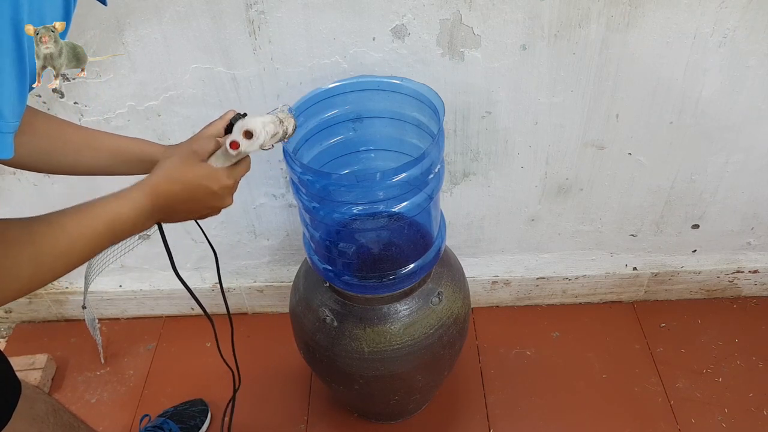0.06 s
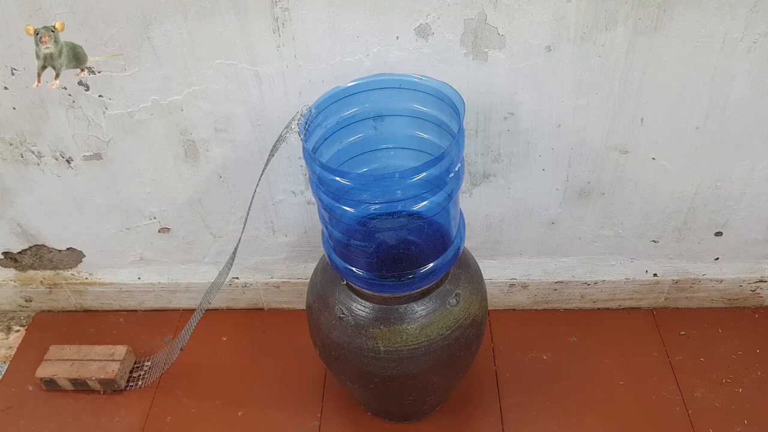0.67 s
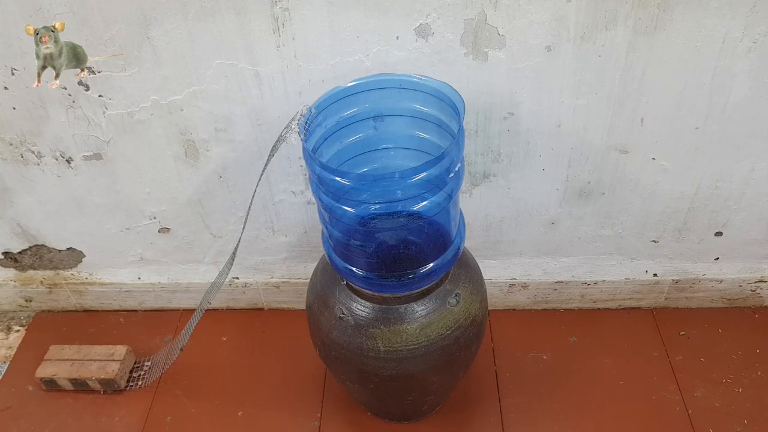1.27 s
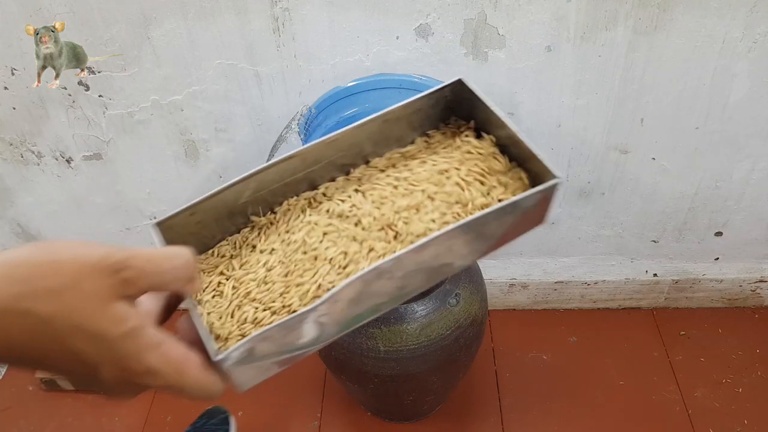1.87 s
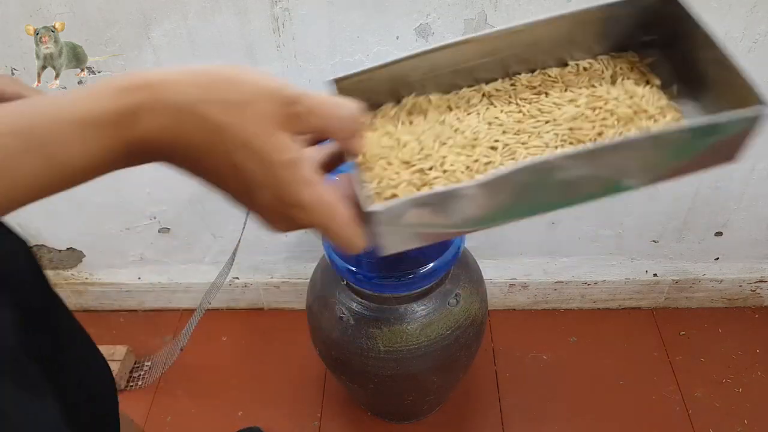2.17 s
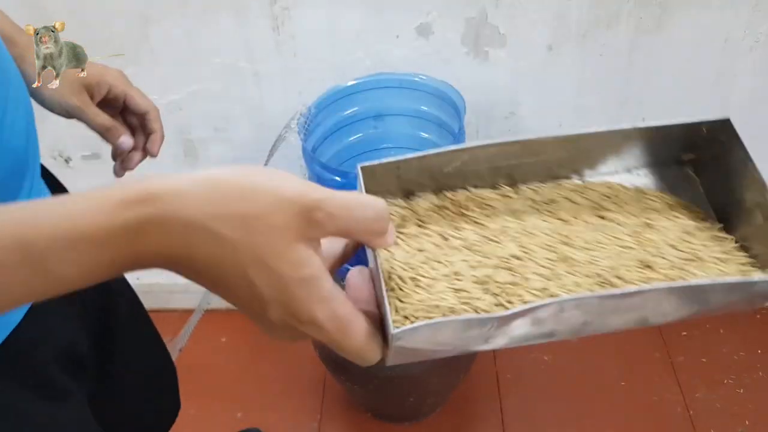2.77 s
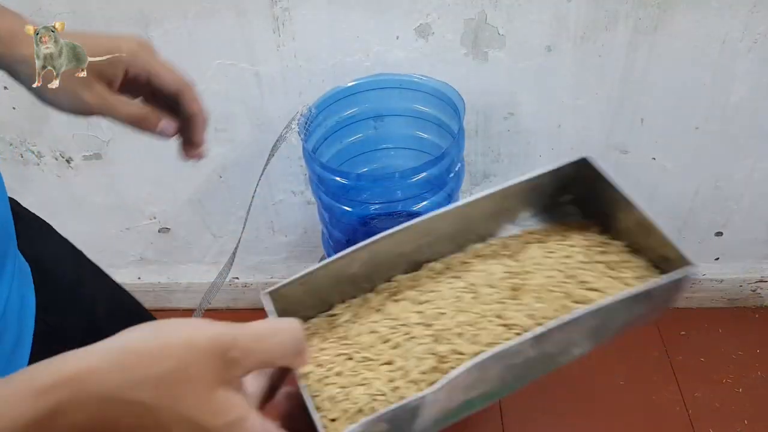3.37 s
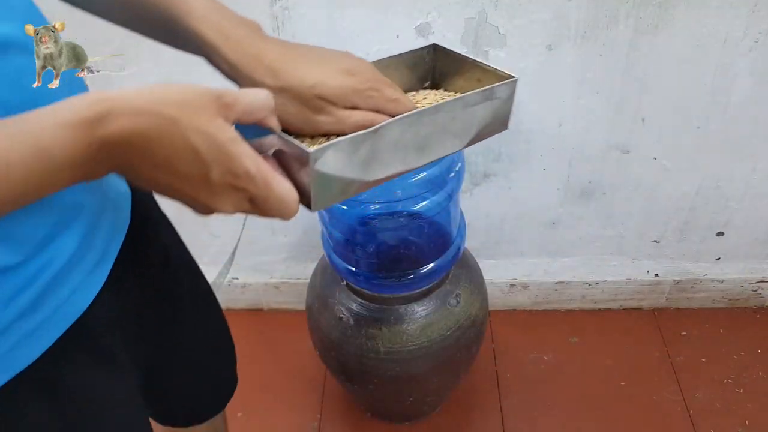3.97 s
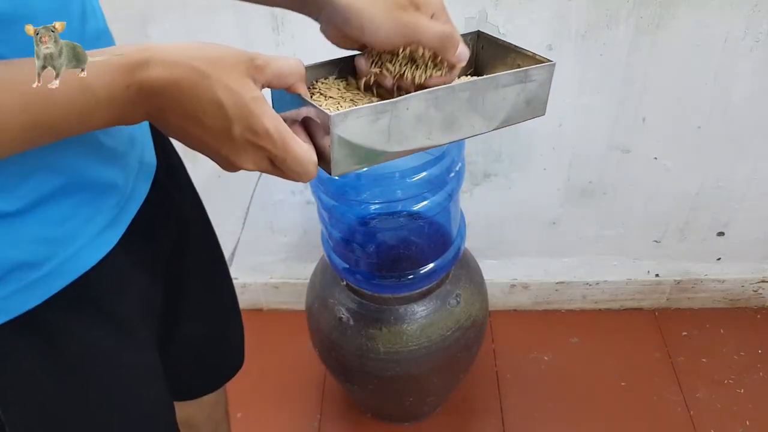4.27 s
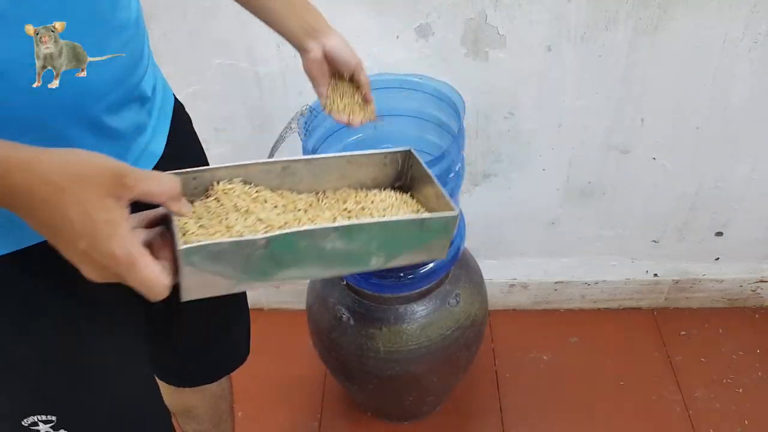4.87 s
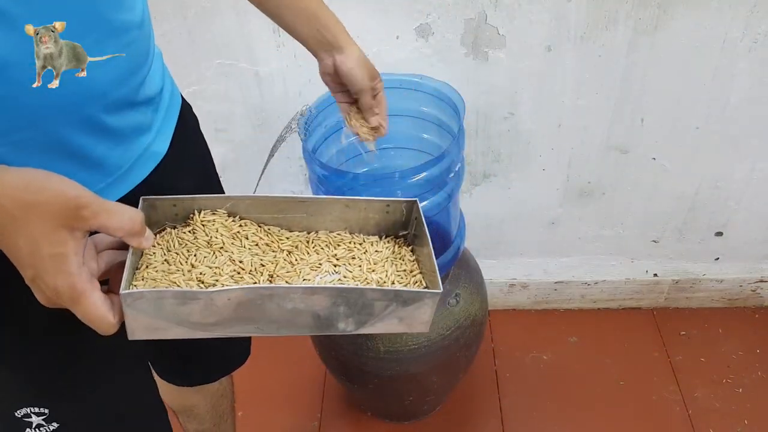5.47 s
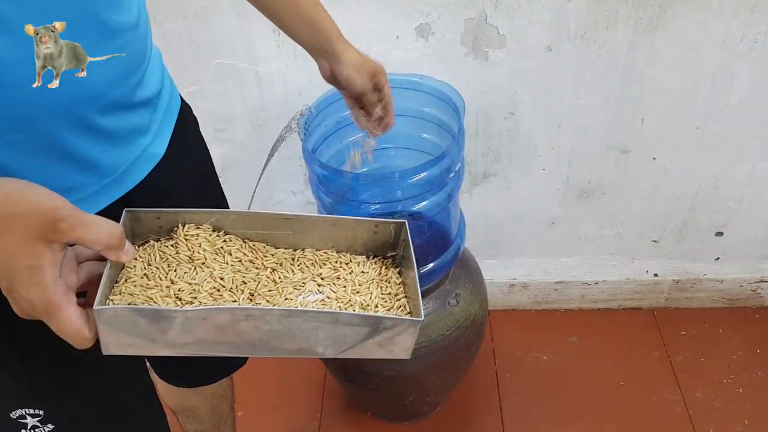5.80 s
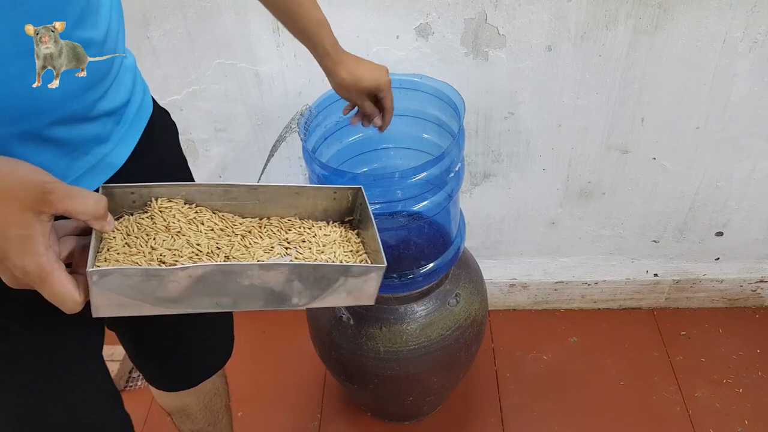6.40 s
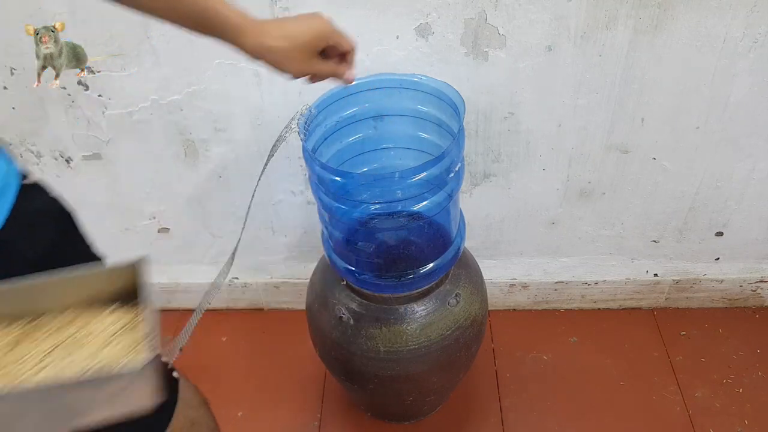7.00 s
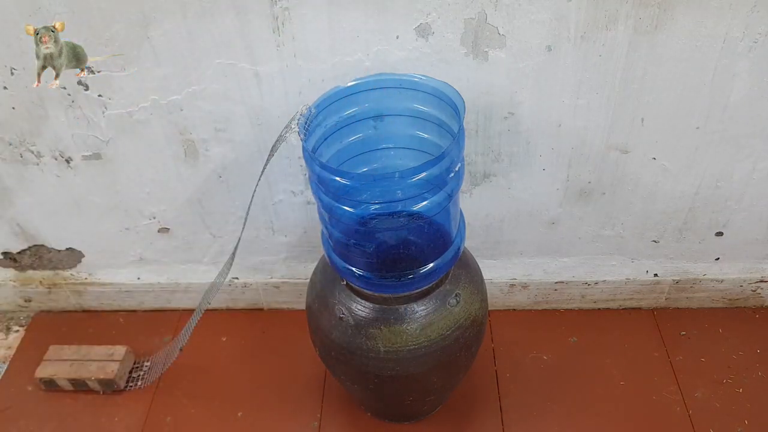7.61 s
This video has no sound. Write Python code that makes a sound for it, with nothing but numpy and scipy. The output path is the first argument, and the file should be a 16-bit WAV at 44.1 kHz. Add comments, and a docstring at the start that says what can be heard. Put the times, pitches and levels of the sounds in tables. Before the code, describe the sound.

Dry grain swishes back and forth in a metal tray indoors, then patters from a hand into a hollow plastic bottle.

```python
"""A bare tiled room, heard on a close pair of microphones over quiet air and a low hum.
Soft steps, scuffs and thin hisses come first, then a metal tray of unhusked rice is shaken to and fro,
the husks scraping its floor. Among faint squeaks and a knock, a hand digs out a fistful and lifts it.
The grain runs from the fist, drums into a big cut-off plastic bottle and thins to single kernels
ticking on its wall. A few more steps and two light knocks end the scene."""
import sys
import numpy as np
from scipy import signal
from scipy.fft import rfft, irfft, next_fast_len
from scipy.io import wavfile
from scipy.ndimage import uniform_filter1d

SR = 44100
rng = np.random.default_rng(int(sys.argv[2]) if len(sys.argv) > 2 else 0)


def bounce(signal):
    """Save signal as a 16-bit WAV file at the path given by the first command-line argument."""
    frames = np.transpose(np.atleast_2d(signal))
    limited = np.clip(frames, -1, 1)
    pcm = np.round(limited * 32767).astype(np.int16)
    wavfile.write(sys.argv[1], SR, pcm)


N = 337365
TIME = np.arange(N) / SR
SIZE = next_fast_len(N + SR, True)
FREQ = np.maximum(np.arange(SIZE // 2 + 1) * SR / SIZE, 1)
LEFT_RIGHT = np.array([[1], [-1]])

# The echo of the tiles. Each row: frequency in Hz, seconds to fall by 60 dB.
ROOM_T60 = [(100, 1), (500, 0.76), (2000, 0.48), (5000, 0.47), (15000, 0.43)]
# The lines of the low hum. Each row: frequency in Hz, width in Hz, level in dB.
HUM_LINES = [(55.2, 8.6, -76.5), (84.8, 7, -69), (159.5, 8.6, -65.5)]

# Sounds that start quickly and die away. Each row: start in seconds, level in dB, decay in seconds.
STEPS = [(.255, -43.5, 0.024), (.78, -47, .027), (.96, -56.5, 0.054), (1.345, -44.5, 0.032),
         (1.92, -49.5, 0.11), (4.34, -53.5, 0.072), (7.26, -54.5, .07), (7.57, -50, 0.052)]  # soft steps and shifts of weight
HISSES = [(.349, -50, 0.034), (.685, -55.5, 0.027), (1.472, -48.5, 0.046)]
KNOCKS = [(3.651, -49, 0.0087), (7.107, -42, 0.0065), (7.638, -36.5, 0.0065)]
CRUNCHES = [(4.05, -28.5, 0.052), (4.15, -40, 0.062), (4.33, -66, 0.024)]  # the fist closing on the grain
# Brushing sounds. Each row: peak time in seconds, level in dB, rise and fall time in seconds.
SCUFFS = [(.455, -44.5, 0.05), (.56, -72, 0.018), (.85, -59.5, 0.053), (1.42, -63.5, 0.054),
          (7.46, -55.5, 0.027)]
TRAY_RUBS = [(.59, -58, .025), (.91, -66, .04), (1.0, -65.5, 0.055), (1.13, -71, 0.032), (4.23, -52.5, .03),
             (4.375, -59.5, 0.028), (7.57, -70, 0.046)]
# Faint squeaks. Each row: start in seconds, level in dB, decay in seconds, pitch in Hz.
SQUEAKS = [(3.35, -52, .04, 5170), (4.24, -55, .05, 5150), (6.77, -55, .025, 4150), (7.23, -59, .035, 4300)]
# Grain moved by the hand. Each row: start in seconds, level in dB, length in seconds.
RAKES = [(3.648, -62, .03), (3.681, -38, 0.091), (3.765, -40, 0.085), (3.9, -45.5, 0.087), (4.0, -50, .05),
         (4.08, -50.5, 0.13)]  # fingers pushing through it
SIFTS = [(4.45, -54.5, 0.12), (4.64, -58, 0.094)]  # kernels falling off the lifted fist
SPURTS = [(4.98, -28.5, .1), (5.16, -23.5, .17), (5.41, -25.5, 0.17), (5.64, -24, 0.17),
          (5.9, -22.5, 0.071), (6.01, -28, 0.082), (6.15, -32, 0.051), (6.31, -34.5, 0.075),
          (6.622, -37, 0.033)]  # fingers loosening over the bottle
# Grain striking the bottle. Each row: start in seconds, relative level in dB.
STRAY_KERNELS = [(4.788, -25), (6.314, -19), (6.38, -19), (6.448, -22.5), (6.53, -29), (6.633, -25.5),
                 (6.7723, -34), (6.933, -26.5), (6.9455, -29), (6.958, -17.5), (7.0594, -39),
                 (7.138, -30.5)]
CLUMPS = [(4.8417, -22.5), (4.866, -18.5), (5.0694, -23.5), (5.1597, -15), (5.476, -18), (5.4895, -16),
          (5.5247, -16), (5.6467, -11), (5.666, -12)]

# The broad tone of each source. Each row: frequency in Hz, relative level in dB.
AIR_COLOUR = [(15, -5.5), (30, -1), (110, -7), (200, 0), (420, -7.5), (800, -21), (1250, -23), (2200, -27),
              (5000, -33), (11000, -31.5), (15500, -26)]
STEP_COLOUR = [(50, -15), (110, -8), (160, -14.5), (230, 3), (330, -12.5), (500, -8), (800, -23),
               (2500, -38)]
HISS_COLOUR = [(500, -27), (6000, -15), (10000, -7), (13000, -5), (15500, 2)]
SCUFF_COLOUR = [(150, -10), (450, -2), (750, -5), (1200, -1.5), (3000, -2), (5500, -2), (9000, -5.5),
                (15500, -12)]
RUB_COLOUR = [(200, -16), (450, 4), (800, -11), (1250, 0.5), (2000, -5.5), (3400, -15), (8000, -22)]
SLIDE_COLOUR = [(150, -23.5), (400, -18.5), (750, -13.5), (1000, -11.5), (1300, -2.5), (1800, -2),
                (2400, -7), (4000, -5.5), (5000, -8), (6500, -7.5), (9000, -10.5), (15500, -10)]
RAKE_COLOUR = [(150, -19), (350, -12.5), (700, -10.5), (950, -8), (1250, 2.5), (1850, -0.5), (2400, -3.5),
               (4000, -4), (7000, -7.5), (15500, -12.5)]
CRUNCH_COLOUR = [(60, -17), (150, -4.5), (300, 1.5), (420, -3), (560, 0.5), (780, -7), (1400, -4.5),
                 (2500, -8), (4500, -18), (9000, -53)]
KNOCK_COLOUR = [(150, -19), (700, -12), (1500, -19), (4000, -22.5), (12000, -25)]
SIFT_COLOUR = [(700, -31), (1400, -13), (3000, -8.5), (6300, -0.5), (11000, -4.5), (15500, -4)]
BOTTLE_WALL_COLOUR = [(300, -26), (800, -34), (1300, -19), (2000, -15), (3000, -11.5), (5000, -17.5),
                      (9500, -17.5), (15500, -21)]
POUR_COLOUR = [(200, -26), (430, -21), (600, -20.5), (760, -20), (1100, -15), (1700, -7), (2300, 0),
               (3100, 2), (4500, -2), (7000, -3.2), (9700, -6), (12000, -7.5), (15700, -5)]

# Resonances of the struck bodies. Each row: frequency in Hz, width in Hz, gain in dB re the broad tone.
TRAY_PANEL_MODES = [(1250, 125, -14.5), (1810, 110, -13), (3040, 280, -11.5), (4240, 52, 3.5),
                    (6270, 260, -8)]
TRAY_FLOOR_MODES = [(90, 13, 16), (162, 26, 4), (325, 58, 0.5), (500, 150, 3.5), (1090, 31, 9),
                    (1320, 84, -2), (1920, 60, -20)]
KNOCK_MODES = [(760, 170, 9), (1250, 150, -3)]
BOTTLE_WALL_MODES = [(2600, 260, -26.5), (3300, 41, 6.5), (4200, 83, 6), (5380, 120, 5), (6980, 210, 3.5)]
BOTTLE_MODES = [(587, 45, 12), (890, 49, 5), (1270, 135, 6.5), (2150, 170, -8), (3250, 67, -16.5),
                (5270, 160, -9.5), (6400, 330, -12.5)]


def undb(db):
    """Decibels to gain."""
    return 10 ** (np.asarray(db) / 20)


def unit(x):
    """Scale to rms 1."""
    return x / np.sqrt(np.mean(np.abs(x) ** 2))


def over_pitch(rows, hz):
    """Read (Hz, value) rows on a log-frequency axis."""
    f, value = np.transpose(rows)
    return np.interp(np.log(hz), np.log(f), value)


def resonance(hz, width):
    """Response of one damped mode, 1 at its centre."""
    return 1 / (1 + 1j * (FREQ / hz - hz / FREQ) * hz / width)


def through(x, response):
    """Filter by a frequency response."""
    return irfft(rfft(x, SIZE) * response, SIZE)[..., :N]


def noise_band(hz, width):
    """A wavering tone of rms 1: noise through a resonance, twice."""
    return unit(through(rng.standard_normal(N), resonance(hz, width) ** 2))


def body(colour, modes=()):
    """Causal response of unit power: a broad colour with modes standing out of it."""
    cepstrum = irfft(np.log(undb(over_pitch(colour, FREQ))), SIZE)
    broad = np.exp(rfft(2 * cepstrum[:SIZE // 2], SIZE))
    return unit(broad * (1 + sum(undb(db) * resonance(hz, width) for hz, width, db in modes)))


def impacts(gain, per_s, spread_db):
    """Random tiny impacts of uneven size, per_s a second, whose rms follows gain."""
    chance = np.clip(per_s / SR, 1e-4, 1)
    size = unit(undb(spread_db * np.clip(rng.standard_normal(N), -2, 2))) * rng.choice([-1, 1], N)
    return gain * size * (rng.random(N) < chance) / np.sqrt(chance)


def bursts(rows, rise_s):
    """Gain of (s, dB, decay s) blows that swell and die away."""
    power = np.zeros(N)
    for s, db, decay in rows:
        start = int(s * SR)
        age = TIME[:max(N - start, 0)][:SR]
        blow = undb(db) * (1 - np.exp(-age / rise_s)) * np.exp(-age / decay)
        power[start:start + len(age)] += blow ** 2
    return np.sqrt(power)


def held(rows, rise_s, fall_s):
    """Gain of (s, dB, length s) moves: a straight attack, a hold, an exponential release."""
    power = np.zeros(N)
    for s, db, length in rows:
        attack = np.clip((TIME - s) / rise_s, 0, 1)
        release = np.exp(-np.clip(TIME - s - length, 0, 2) / fall_s)
        power += (undb(db) * attack * release) ** 2
    return np.sqrt(power)


def swells(rows):
    """Gain of (s, dB, rise and fall s) brushes that grow and fade alike."""
    return sum(undb(db) * np.exp(-abs(TIME - s) / slope_s) for s, db, slope_s in rows)


def room_tail(alike_hz=750, early_db=4, early_s=0.0032):
    """Near reflections, then diffuse echo: bass is alike at both microphones, treble dies first."""
    t, hz = TIME[:SR], np.maximum(np.arange(SR // 2 + 1), 1)
    mid, side = rfft(rng.standard_normal((2, SR)))
    alike = .92 / (1 + (hz / alike_hz) ** 4)
    both = mid * np.sqrt(1 + alike) + LEFT_RIGHT * side * np.sqrt(1 - alike)
    octave = np.clip(np.log2(hz / 125), 0, 7)
    early = undb(early_db) * np.exp(-t / early_s)
    tail = 0
    for k in range(8):
        band = irfft(both * np.maximum(1 - abs(octave - k), 0), SR)
        late = undb(-60 * t / over_pitch(ROOM_T60, 125 * 2 ** k))
        tail = tail + band * unit(early + late)
    return rfft(tail / np.sqrt(2 * SR), SIZE)


def room_spots(lag_s=.0001, count=6):
    """Spots where an impact may land, each with its own lag between the microphones and its own echo."""
    lags = np.linspace(-lag_s, lag_s, count)
    return [(np.exp(1j * np.pi * FREQ * lag * LEFT_RIGHT), room_tail()) for lag in lags]


def place(hits, response, spots, wet_db, pan_db):
    """Deal hits among the spots, ring the body, carry it to the pair; negative pan_db is to the right."""
    spot, wet = rng.integers(0, len(spots), N), undb(wet_db)
    heard = sum(rfft(hits * (spot == k), SIZE) * (direct + wet * echo)
                for k, (direct, echo) in enumerate(spots))
    balance = undb(LEFT_RIGHT * pan_db / 2)
    return irfft(heard * response, SIZE)[:, :N] / np.hypot(1, wet) * balance


def room_tone(air_db=-63, side_db=-12, wide_hz=1200, swell_at_s=2.27, swell_db=13.5, swell_s=0.085):
    """Quiet air, wider towards the treble, and a wavering low hum whose top line swells once."""
    mid, side = through(rng.standard_normal((2, N)), body(AIR_COLOUR))
    side = through(side, np.minimum(undb(side_db) + FREQ / wide_hz / 2, 1))
    air = undb(air_db) * (mid + LEFT_RIGHT * side)
    lines = [undb(db) * noise_band(hz, width) for hz, width, db in HUM_LINES]
    hum = sum(lines) + lines[-1] * swells([(swell_at_s, swell_db, swell_s)])
    return (air + hum) * undb(-1.1 * LEFT_RIGHT)


def footsteps(spots):
    """Feet land softly on the tiles with a dull thud, right of centre."""
    hits = impacts(bursts(STEPS, rise_s=0.013), per_s=3000, spread_db=1)
    return place(hits, body(STEP_COLOUR), spots, wet_db=2, pan_db=-5)


def hisses():
    """Brief thin hisses, dry and the same in both microphones."""
    hits = impacts(bursts(HISSES, rise_s=0.0055), per_s=12000, spread_db=2)
    return through(hits, body(HISS_COLOUR))


def scuffs(spots):
    """Feet and clothes brush softly off-mic, more room than direct sound."""
    hits = impacts(swells(SCUFFS), per_s=12000, spread_db=5.5)
    return place(hits, body(SCUFF_COLOUR), spots, wet_db=7, pan_db=-3.5)


def handled_tray(spots):
    """The tray rubs dully in the hand that carries it, off to the right."""
    hits = impacts(swells(TRAY_RUBS), per_s=6000, spread_db=3)
    return place(hits, body(RUB_COLOUR), spots, wet_db=5, pan_db=-7)


def shaken_tray(spots, first_s=1.65, strokes=14, gap_s=.1305, quicken_s=.00076, half_stroke_s=0.07,
                shake_db=-33, ease_at_s=2.4, ease_db_per_s=4, shift_db=-12):
    """Close up, the bed of grain slides once a stroke; the faster, the more husks scrape the metal."""
    gaps = gap_s - quicken_s * (np.arange(strokes - 1) + .5)
    peaks = first_s + np.cumsum(np.r_[0, gaps])
    speed = np.zeros(N)
    for s, (force, reach) in zip(peaks, rng.standard_normal((strokes, 2))):
        half_s = half_stroke_s * np.exp(0.084 * reach)
        phase = np.clip((TIME - s) / half_s, -1, 1)
        speed += undb(0.5 * force) * np.cos(np.pi / 2 * phase) ** 2
    # The grain keeps shifting between strokes; the arm holds its effort, then eases off.
    shifting = held([(first_s, shift_db, peaks[-1] - first_s)], rise_s=half_stroke_s, fall_s=0.046)
    effort = undb(shake_db - ease_db_per_s * np.maximum(TIME - ease_at_s, 0))
    hard_throw = swells([(2.297, -34, 0.041)])  # one stroke throws the grain against the end wall
    gain = np.hypot(np.hypot(speed, shifting) * effort, hard_throw)
    hits = impacts(gain, per_s=2000 + 14000 * gain / gain.max(), spread_db=4)
    return place(hits, body(SLIDE_COLOUR, TRAY_PANEL_MODES), spots, wet_db=-2.5, pan_db=-2.5)


def squeaks(spots, width_hz=900):
    """Short, rough, high squeaks from one spot well to the right."""
    tones = sum(bursts([(s, db, decay)], rise_s=0.0037) * noise_band(hz, width_hz)
                for s, db, decay, hz in SQUEAKS)
    return place(tones, 1, spots[:1], wet_db=2, pan_db=-10)


def digging_hand(spots):
    """Fingers rustle into the grain, then close on the tray floor, which rumbles with the crunch."""
    rustle = impacts(held(RAKES, rise_s=0.0084, fall_s=0.096), per_s=8000, spread_db=5.5)
    crunch = impacts(bursts(CRUNCHES, rise_s=0.021), per_s=4000, spread_db=0.5)
    return (place(rustle, body(RAKE_COLOUR), spots, wet_db=4, pan_db=-2.5)
            + place(crunch, body(CRUNCH_COLOUR, TRAY_FLOOR_MODES), spots, wet_db=3.5, pan_db=-1.5))


def knocks(spots):
    """Light knocks, fairly near, ring two hollow modes."""
    hits = impacts(bursts(KNOCKS, rise_s=.001), per_s=9000, spread_db=2)
    return place(hits, body(KNOCK_COLOUR, KNOCK_MODES), spots, wet_db=-0.5, pan_db=-3.5)


def lifted_fist(spots):
    """Loose kernels sift from the fist back onto the grain with a fine, bright rustle."""
    hits = impacts(held(SIFTS, rise_s=0.024, fall_s=0.068), per_s=5000, spread_db=2)
    return place(hits, body(SIFT_COLOUR), spots, wet_db=2, pan_db=-4)


def stray_kernels(spots, strike_db=-2, skitter_s=0.0044, rattle_db=-24, rattle_s=0.11):
    """Single kernels strike the plastic wall, skitter for some milliseconds and rattle to rest."""
    striking = bursts([(s, db + strike_db, skitter_s) for s, db in STRAY_KERNELS], rise_s=0.00043)
    settling = bursts([(s, db + rattle_db, rattle_s) for s, db in STRAY_KERNELS], rise_s=0.0062)
    ticks = impacts(striking, per_s=16000, spread_db=2)
    rattle = impacts(settling, per_s=2500, spread_db=7)
    return (place(ticks, body(BOTTLE_WALL_COLOUR, BOTTLE_WALL_MODES), spots[::2], wet_db=0, pan_db=-2.6)
            + place(rattle, body(BOTTLE_WALL_COLOUR), spots, wet_db=1, pan_db=-2.6))


def poured_grain(spots, open_s=4.836, thinning_s=6.04, empty_s=6.67, stream_db=-30,
                 trickle_db=-54, trickle_end_s=6.92, rise_s=.022, fall_s=0.03,
                 dribble_db=1.3, dribble_s=.007, clump_db=1, clump_s=0.0046):
    """Grain spurts from the fist and drums on the bottle floor; a thinner stream has fewer kernels."""
    opening = np.clip((TIME - open_s) / rise_s, 0, 1)
    left_in_fist = np.clip((empty_s - TIME) / (empty_s - thinning_s), 0, 1)
    # Kernels that stick to the palm trickle on after the stream.
    trickle = held([(open_s, trickle_db, trickle_end_s - open_s)], rise_s, fall_s)
    steady = undb(stream_db) * opening * left_in_fist + trickle
    flow = np.hypot(steady, held(SPURTS, rise_s, fall_s))
    dribble = unit(uniform_filter1d(rng.standard_normal(N), int(dribble_s * SR)))
    clumps = bursts([(s, db + clump_db, clump_s) for s, db in CLUMPS], rise_s=0.00093)
    gain = np.hypot(flow * undb(dribble_db * dribble), clumps)
    hits = impacts(gain, per_s=1200 + 7000 * gain / flow.max(), spread_db=3.5)
    return place(hits, body(POUR_COLOUR, BOTTLE_MODES), spots, wet_db=2.5, pan_db=-3)


def scene():
    """The shaken tray close to the microphones, the bottle further back, both a little to the right."""
    spots = room_spots()
    return (room_tone() + footsteps(spots) + hisses() + scuffs(spots)
            + handled_tray(spots) + shaken_tray(spots) + squeaks(spots)
            + digging_hand(spots) + knocks(spots) + lifted_fist(spots)
            + stray_kernels(spots) + poured_grain(spots))


def record(dry, left_dip_hz=10900, right_dip_hz=11500, dip_width_hz=1800, dip_db=-6, top_hz=16000):
    """Each microphone port has a dip in the treble; the recorder cuts the top steeply."""
    depth = 1 - undb(dip_db)
    ports = np.array([1 - depth * resonance(hz, dip_width_hz) for hz in (left_dip_hz, right_dip_hz)])
    top_cut = signal.ellip(12, .1, 80, top_hz, fs=SR, output="sos")
    return signal.sosfilt(top_cut, through(dry, ports))


dry = scene()
out = record(dry)
bounce(out)
```